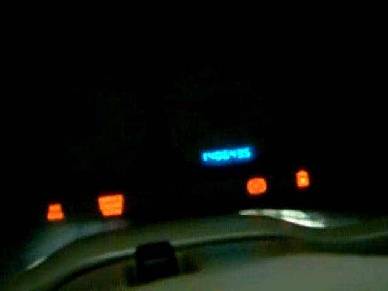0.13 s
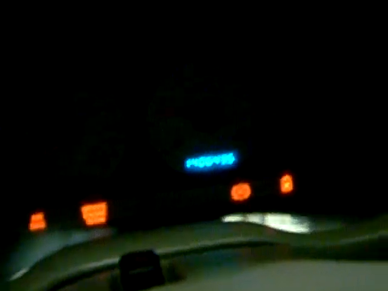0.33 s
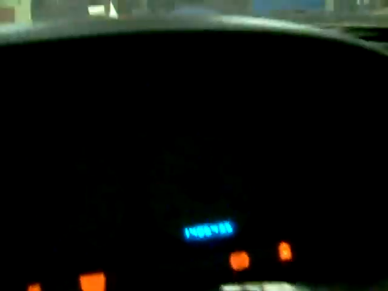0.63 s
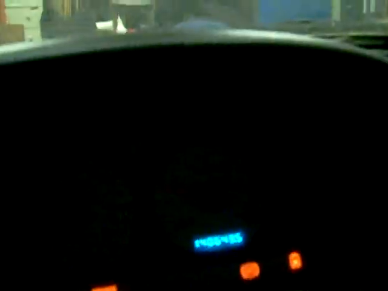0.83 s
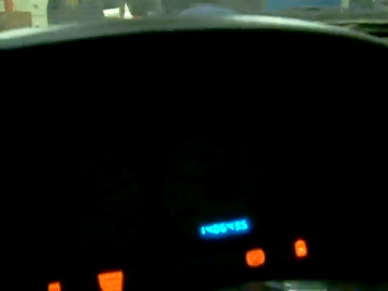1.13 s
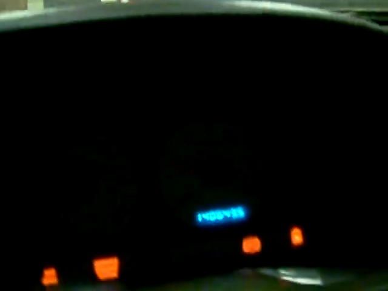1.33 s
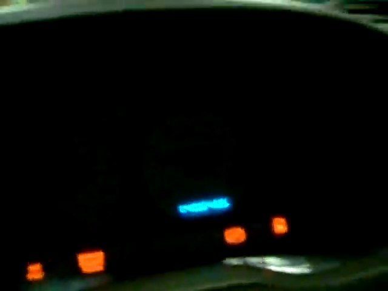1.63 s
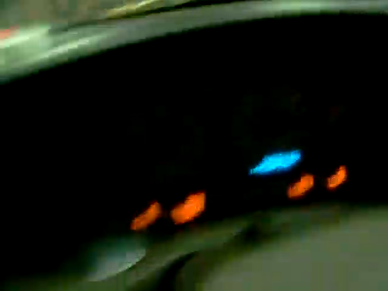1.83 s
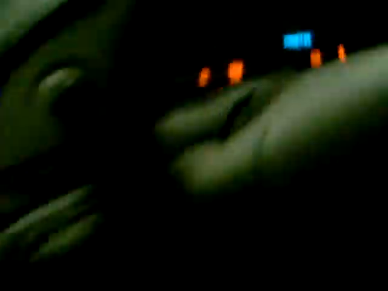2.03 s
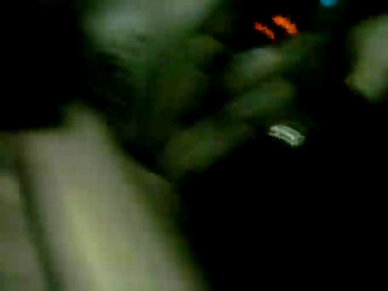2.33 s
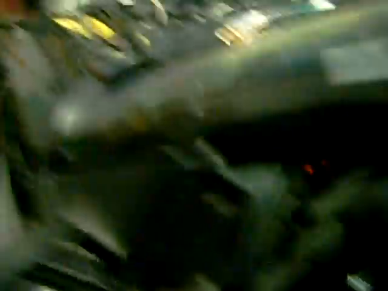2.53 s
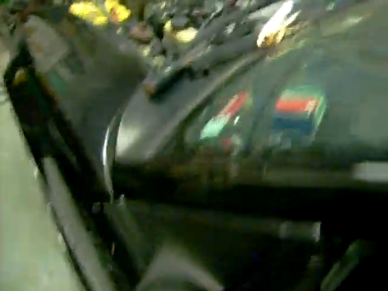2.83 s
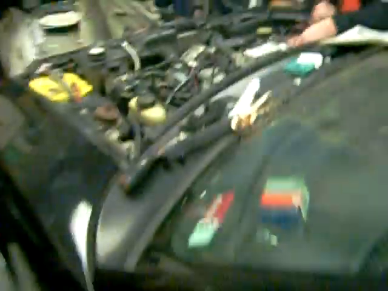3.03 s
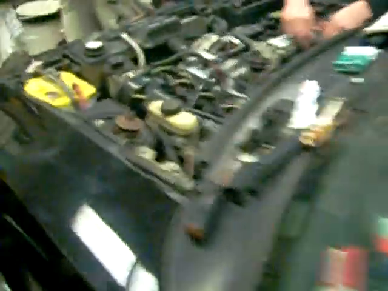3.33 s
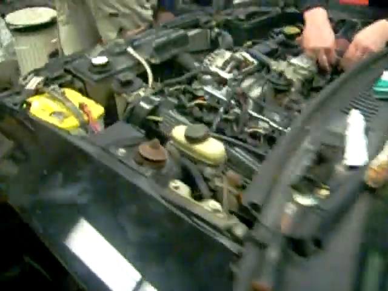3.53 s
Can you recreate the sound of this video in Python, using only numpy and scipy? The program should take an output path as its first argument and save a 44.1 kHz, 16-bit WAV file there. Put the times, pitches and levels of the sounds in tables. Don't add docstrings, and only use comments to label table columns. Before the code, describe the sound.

Steady, boomy engine drone from the driver's area, with faint hiss; after about two and a half seconds it swells into two honking revs beside the exposed engine, close and distorted on a small microphone.

```python
import sys
import numpy as np
from scipy import signal
from scipy.io import wavfile
from scipy.ndimage import uniform_filter1d

SR = 44100
rng = np.random.default_rng(int(sys.argv[2]) if len(sys.argv) > 2 else 0)


def put_to_file(sound):
    columns = np.atleast_2d(sound).T
    safe = np.clip(columns, -1, 1)
    whole_steps = np.round(safe * 32767)
    wavfile.write(sys.argv[1], SR, whole_steps.astype(np.int16))


def attenuation_scalar(level_db):
    decades = np.asarray(level_db, float) / 20
    return 10 ** decades


N = 161847


def evened(x):
    return x / np.sqrt(np.mean(x ** 2) + 1e-20)


def read(points, hz):
    f, value = np.transpose(points)
    return np.interp(np.log(hz + 1), np.log(f + 1), value)


def control(points, t):
    return np.interp(t, *np.transpose(points))


def outside(t):
    door_s, door_span_s = 2.61, 0.42
    return .5 + .5 * np.tanh((t - door_s) / door_span_s)


def lorentzian(hz, centre_hz, half_width_hz):
    return 1 / (1 + ((hz - centre_hz) / half_width_hz) ** 2)


def resonate(x, hz, width_hz):
    turn = np.exp(2j * np.pi * hz * np.arange(len(x)) / SR)
    r = np.exp(-np.pi * width_hz / SR)
    return 2 * turn * signal.lfilter([1 - r], [1, -r], x / turn)


def ringing(x, hz, width_hz, steady):
    z = resonate(resonate(x, hz, width_hz), hz, width_hz)
    levelled = z / (abs(z) + 1e-12) ** steady
    return evened(levelled.real)


def drift(t, top_hz):
    coarse = t[::64]
    slow = 0
    for f in np.geomspace(.3, top_hz, num=16):
        slow = slow + np.sin(2 * np.pi * (f * coarse + rng.random())) / np.sqrt(f)
    return np.interp(t, coarse, evened(slow))


def noise(field_db, patchy_db):
    frames, hz = N // 256 + 5, np.fft.rfftfreq(1024, 1 / SR)[:, None]
    real, imag, patches = rng.standard_normal((frames, 513, 3)).T
    patches = uniform_filter1d(patches, size=10, axis=0)
    patches = evened(uniform_filter1d(patches, size=12, axis=1))
    level_db = field_db(hz, np.arange(frames) * 256 / SR) + patchy_db * patches
    z = (real + 1j * imag) * attenuation_scalar(level_db)
    return signal.istft(z, nperseg=1024, noverlap=768)[1][:N]


# t/s, f/Hz
CYCLE_RATE = [(0, 11.05), (.27, 11.05), (.65, 11.76), (.9, 11.63), (1.13, 11.78), (1.4, 11.34),
              (1.65, 11.36), (2.0, 11.63), (2.25, 11.28), (2.52, 10.62), (2.68, 11.0), (2.85, 12.5),
              (3.05, 14.8), (3.22, 16.2), (3.32, 15.9), (3.44, 14.4), (3.52, 12.7), (3.67, 13.6)]


def crank(t):
    rate_hz = uniform_filter1d(control(CYCLE_RATE, t), size=3000, mode="nearest")
    return np.cumsum(rate_hz) / SR


# multiple of the cycle, cabin level/dB, outside level/dB
ENGINE_ORDERS = [(2, -38, -42), (3, -42, -29), (4, -29, -44), (6, -36, -46), (7, -42, -44), (8, -34, -25),
                 (10, -39, -46), (11, -46, -48), (12, -37, -48), (13, -45, -50), (14, -47, -50),
                 (15, -45, -50), (17, -44, -46)]
# t/s, level/dB
CABIN_BOOM = [(0.0, -14), (0.05, -13), (0.63, -17.5), (1.08, -19), (1.39, -15), (1.45, -21.5),
              (1.56, -15.5), (2.2, -18), (2.53, -25.5), (2.87, -19.5), (2.98, -41), (3.0, -30.5)]


def orders(t, turns):
    out, cycle_hz = outside(t), np.gradient(turns) * SR
    boom_db = control(CABIN_BOOM, t) - 34 * np.clip(t - 3.08, 0, .25)
    tones = attenuation_scalar(boom_db) * np.sin(2 * np.pi * 5 * turns)
    for k, in_db, out_db in ENGINE_ORDERS:
        level_db = in_db + (out_db - in_db) * out
        waver_db = 2.5 * drift(t, top_hz=5)
        honk_db = 11 * lorentzian(k * cycle_hz, 131, 11)
        tone = np.sin(2 * np.pi * (k * turns + rng.random()))
        tones = tones + attenuation_scalar(level_db + waver_db + honk_db) * tone
    return np.sqrt(2) * tones


CYLINDERS = [2.5, -2, 2, -7.5, -1.5, -2.5, -9, 0.5]


def breath(turns):
    firing = np.floor(8 * turns).astype(int)
    chance_db = 3.5 * rng.uniform(-1, 1, size=500)
    size = attenuation_scalar(np.array(CYLINDERS)[firing % 8] + chance_db[firing])
    gulps = size * (np.diff(firing, prepend=0) > 0)
    puff_shape = 0.41 + np.exp(-(8 * turns % 1) / .3)
    puffs = size * puff_shape * rng.standard_normal(N)
    pulse_share = 0.41
    return pulse_share * evened(gulps - gulps.mean()) + (1 - pulse_share) * evened(puffs)


# f/Hz, width/Hz,
# cabin level/dB, outside level/dB, share of the effort followed
RUNG_MODES = [(133.58, 6.1, -3.5, -1, 0.95), (246.9, 10.8, -4.5, -5.5, 0.24),
              (262.7, 7.5, -12.5, -12, 0.52), (378.2, 7.7, -10, -9, 0.58), (355, 23.3, -12.5, -11, 0.3),
              (500.2, 3.94, -14.5, -14, .1), (469.6, 14, -18.5, -19.5, 0.27), (564, 18, -24, -18.5, 0.55),
              (652.8, 17, -22.5, -24.5, 0.88), (394, 7.4, -33.5, -16.5, 0.77), (519.6, 5.7, -26, -15.5, .5),
              (123.3, 9.4, -12, -14, 0.31), (889.3, 24, -25.5, -23, .4), (1006.3, 38, -26.5, -21, 0.32)]
# t/s, level/dB
INTAKE_EFFORT = [(0.0, -26), (0.06, -26), (1.28, -25), (1.29, -26), (2.41, -24.5), (2.49, -38),
                 (2.53, -19.5), (2.63, -28.5), (2.73, -12.5), (2.88, -14.5), (2.95, -9), (3.07, -21),
                 (3.1, -9.5), (3.14, -13.5), (3.24, -13.5), (3.32, -28.5), (3.63, -8.5), (3.67, -12)]
# f/Hz, t/s, half length/s, lift/dB
STANDING_CRESTS = [(250, 0.04, 0.13, 7), (502, 1.28, 0.095, 7), (502, 1.995, 0.27, 10),
                   (379, 1.3, .25, 2.5), (379, 2.41, .25, 6), (379, 2.5, 0.029, 11), (379, 3.03, 0.11, 5.5),
                   (266, 2.9, .15, 6), (560, 3.1, .12, 10), (521, 2.89, 0.043, 3), (521, 3.6, 0.038, 7),
                   (393, 3.1, 0.26, 7), (502, 3, 0.066, 14), (502, 2.98, .06, -8), (250, 2.52, .08, 4),
                   (379, 1.8, .1, 4), (890, .8, .5, 6), (1010, 0.73, 0.38, 4.5), (134.5, 2.96, 0.24, 1.5)]


def intake(t, turns):
    drive = breath(turns)
    reference_db = -25
    effort_db = control(INTAKE_EFFORT, t) - reference_db
    out, pipe = outside(t), 0
    for hz, width_hz, in_db, out_db, follow in RUNG_MODES:
        crest_db = 0
        for crest_hz, s, half_s, lift_db in STANDING_CRESTS:
            if abs(crest_hz / hz - 1) < 1 / 40:
                crest_db = crest_db + lift_db * np.exp(-((t - s) / half_s) ** 2)
        level_db = reference_db + in_db + (out_db - in_db) * out + follow * effort_db + crest_db
        pipe = pipe + attenuation_scalar(level_db) * ringing(drive, hz, 1.46 * width_hz, steady=.5)
    return pipe


# f/Hz, level/dB per Hz
CABIN_ROAR = [(350, -9.5), (600, -1), (826, -9), (965, -4.5), (2160, -10), (3770, -6), (5340, -24),
              (6940, -41), (11700, -120)]
# f/Hz, level/dB per Hz
BAY_ROAR = [(350, -28), (600, -1.5), (826, -12.5), (1030, -4), (1670, -10), (3840, -8.5), (5340, -23),
            (6940, -52.5), (11700, -120)]
# f/Hz, half width/Hz, lift/dB
ROAR_MODES = [(1333, 30, 1.5), (1500, 48, 4), (1598, 47, -4.5), (1870, 164, 3), (2110, 160, -2),
              (3080, 200, 1.5), (3900, 200, 3),
              (890, 30, 6), (1010, 40, 5), (1100, 35, -3)]
# f/Hz, level/dB per Hz
AIR_HISS = [(3900, -61), (4400, -36), (5300, -22.5), (7000, -31), (11500, -42)]
# t/s, level/dB
NEARNESS = [(0.0, -36), (0.06, -38.5), (0.07, -37), (0.7, -37), (1.56, -38.5), (1.58, -36.5), (1.85, -37.5),
            (2.2, -35.5), (2.74, -27), (2.8, -24), (2.91, -24.5), (3.11, -29), (3.42, -32.5), (3.44, -28.5),
            (3.58, -26), (3.67, -27)]


def roar(t, turns):
    def field(hz, s):
        cabin_db, bay_db = read(CABIN_ROAR, hz), read(BAY_ROAR, hz)
        lift_db = sum(db * lorentzian(hz, f, half) for f, half, db in ROAR_MODES)
        body_db = cabin_db + (bay_db - cabin_db) * outside(s) + lift_db
        return 10 * np.log10(attenuation_scalar(2 * body_db) + attenuation_scalar(2 * read(AIR_HISS, hz)))

    hiss = noise(field, patchy_db=1.23)
    hiss = hiss / np.sqrt(uniform_filter1d(hiss ** 2, size=16384))
    throb = 1 + 0.061 * np.cos(2 * np.pi * 8 * turns) + 0.035 * np.cos(2 * np.pi * 2 * turns)
    return attenuation_scalar(control(NEARNESS, t) + 2.0) * throb * hiss


# f/Hz, level/dB per Hz
SHELL_RUMBLE = [(8.8, -44), (15, -3), (64, 6.5), (193, -11), (253, 6), (306, -20.5), (369, -36), (431, -20),
                (900, -29), (1170, -64.5), (1980, -120)]


def shell_rumble(t):
    rumble = evened(noise(lambda hz, s: read(SHELL_RUMBLE, hz) + 0 * s, patchy_db=-6.5))
    lift_db = 0.17 * (control(NEARNESS, t) - control(NEARNESS, 1))
    return attenuation_scalar(-41.5 + lift_db) * rumble


def shake():
    return attenuation_scalar(-30) * ringing(rng.standard_normal(N), 25, 9.0, steady=.3)


def whine(t):
    return attenuation_scalar(-69) * np.sin(2 * np.pi * 7418 * t)


def squeak(t):
    burst = np.exp(-((t - .615) / .022) ** 2)
    return attenuation_scalar(-63) * ringing(rng.standard_normal(N), 9250, 600, steady=0) * burst


def scene():
    t = np.arange(N) / SR
    turns = crank(t)
    engine = orders(t, turns) + intake(t, turns) + roar(t, turns)
    background = shell_rumble(t) + shake() + whine(t) + squeak(t)
    return (engine + background)[None]


def band_limit(x):
    return signal.sosfilt(signal.butter(12, 15740, fs=SR, output="sos"), x)


def record(dry):
    edge_hz, ceiling = 11050, .71
    lowpass = signal.firwin(511, edge_hz, window=("kaiser", 9), fs=SR)
    limited = signal.oaconvolve(dry, lowpass[None], "same")
    return band_limit(np.clip(limited, -ceiling, ceiling))


dry = scene()
out = record(dry)
put_to_file(out)
```